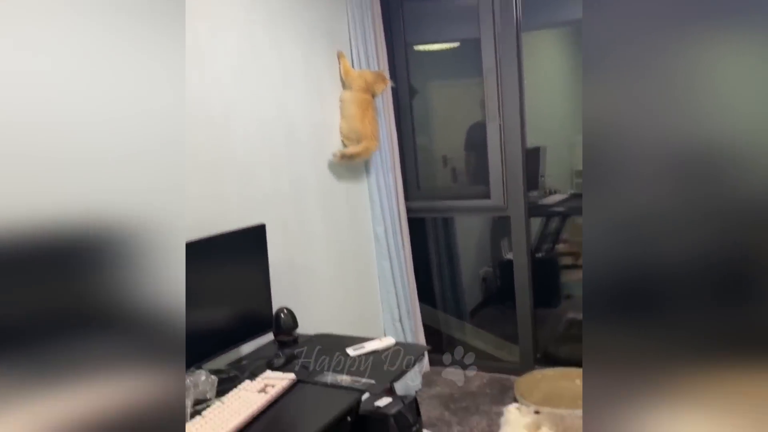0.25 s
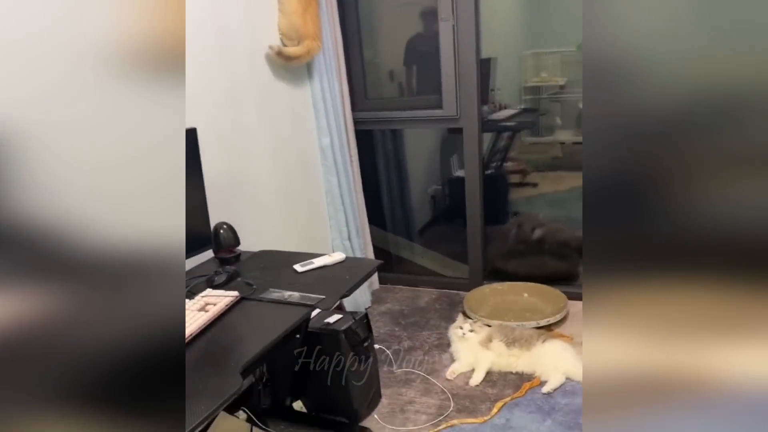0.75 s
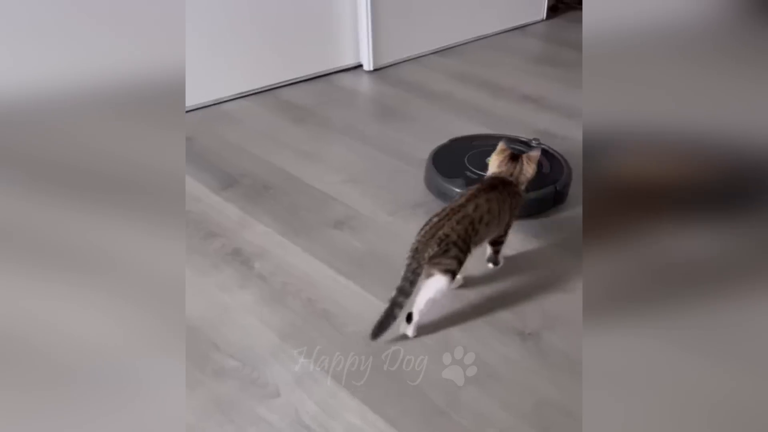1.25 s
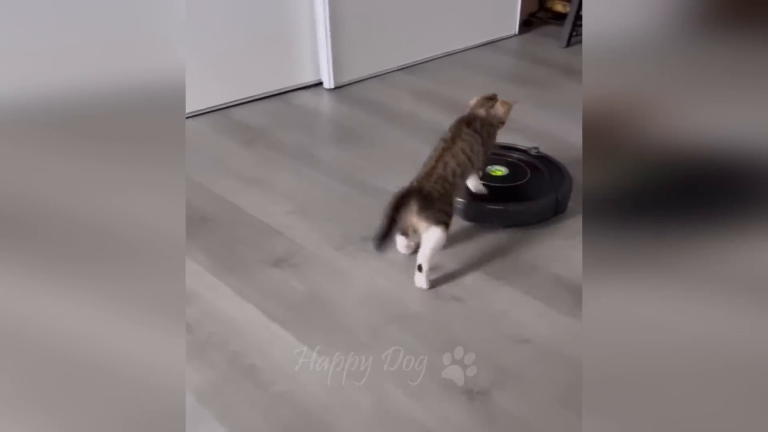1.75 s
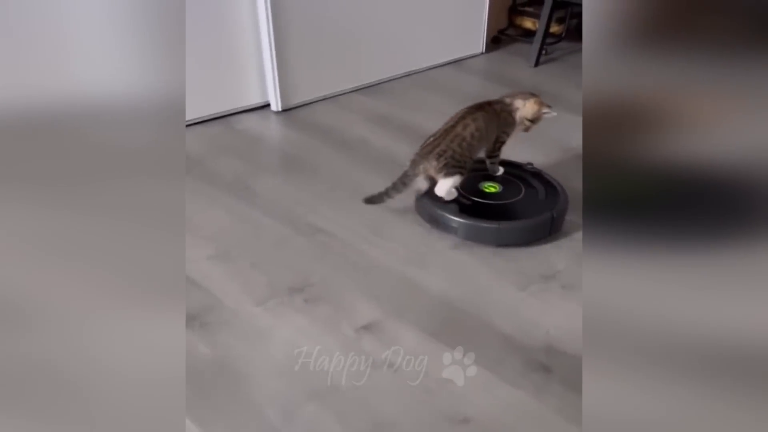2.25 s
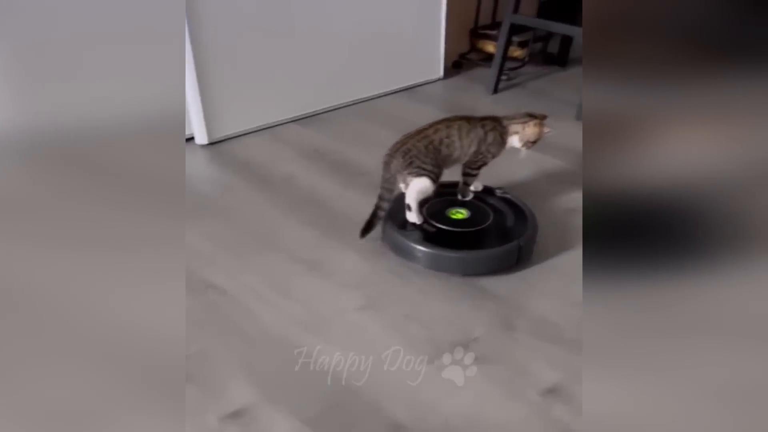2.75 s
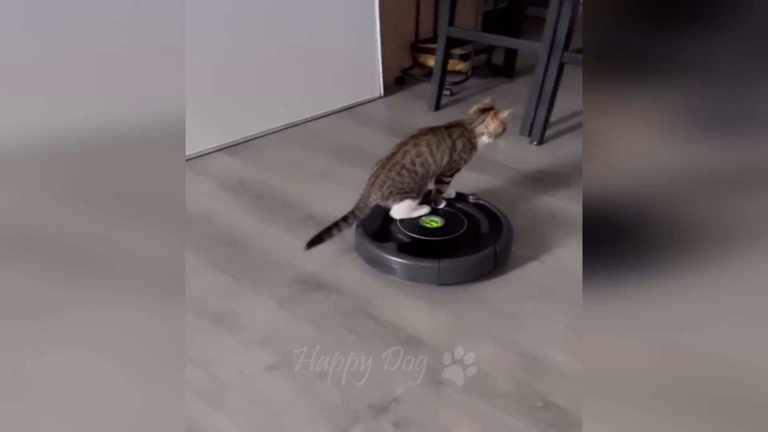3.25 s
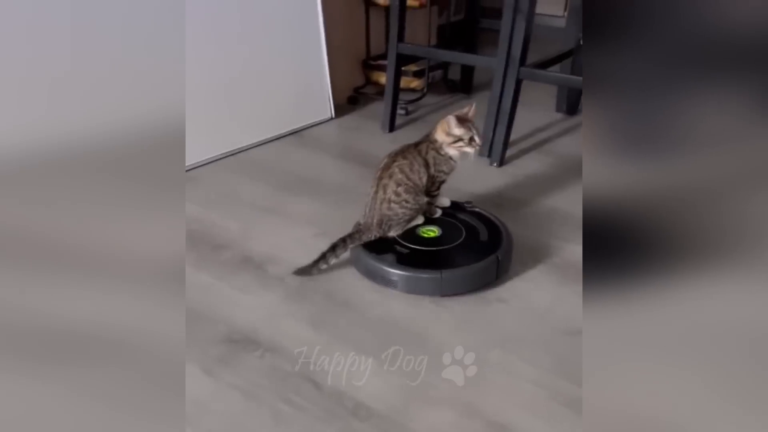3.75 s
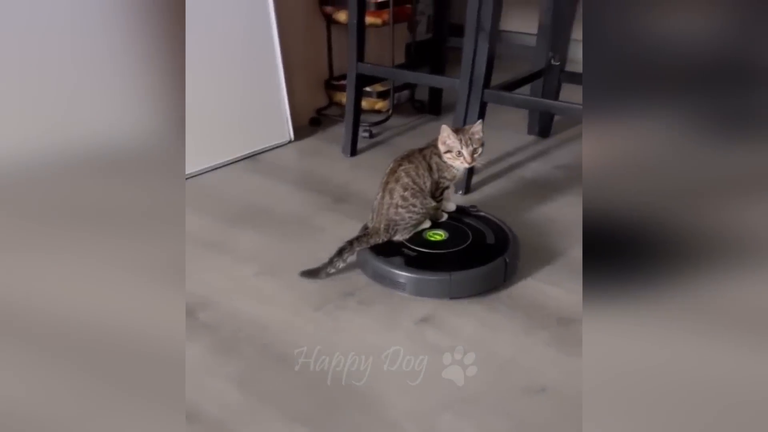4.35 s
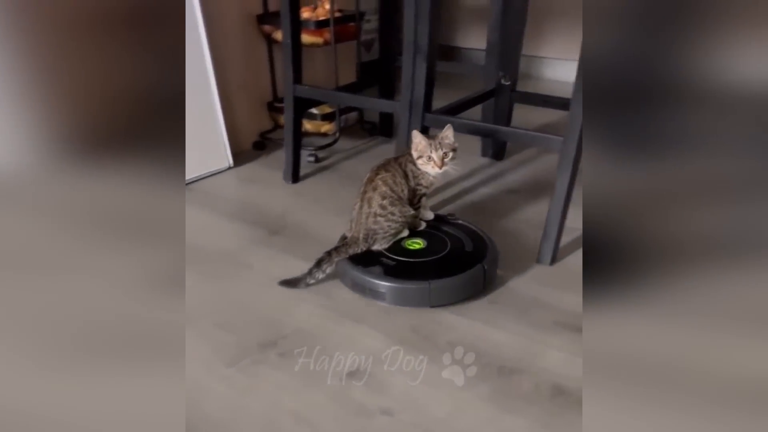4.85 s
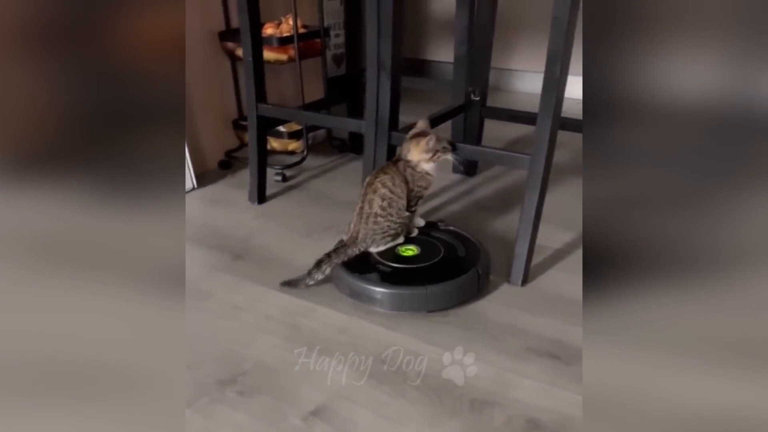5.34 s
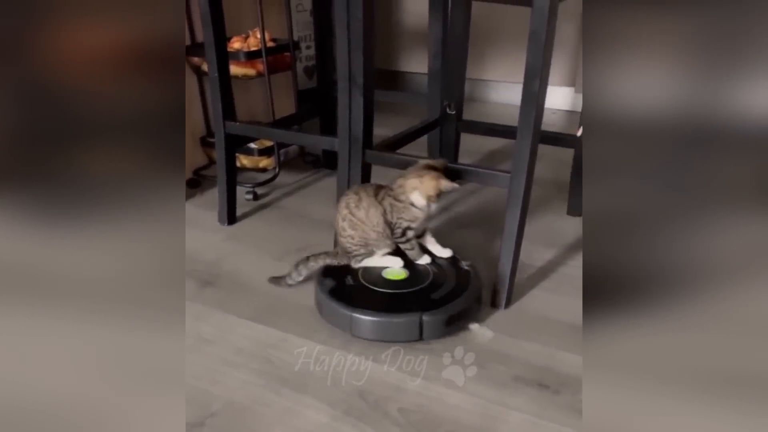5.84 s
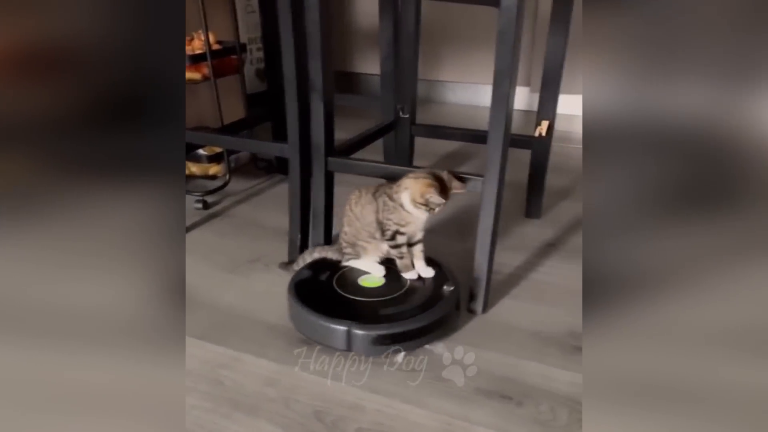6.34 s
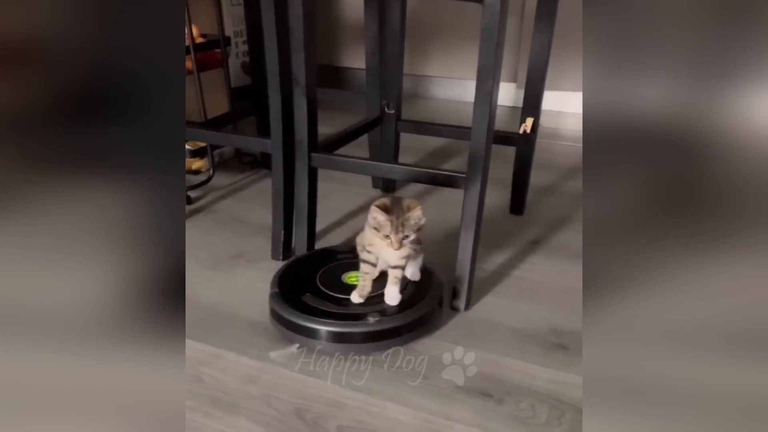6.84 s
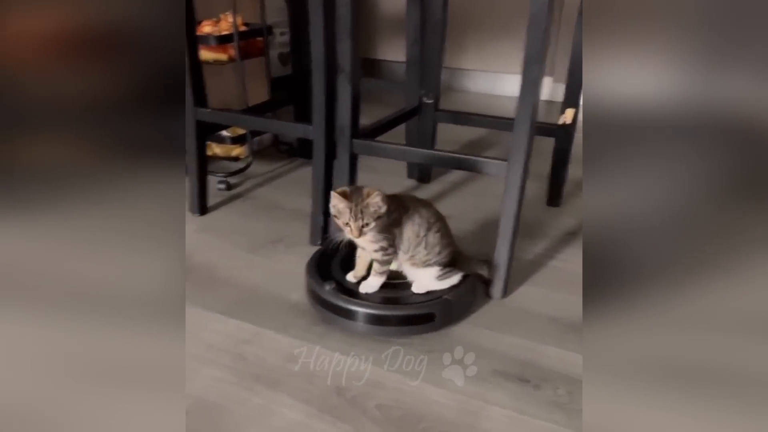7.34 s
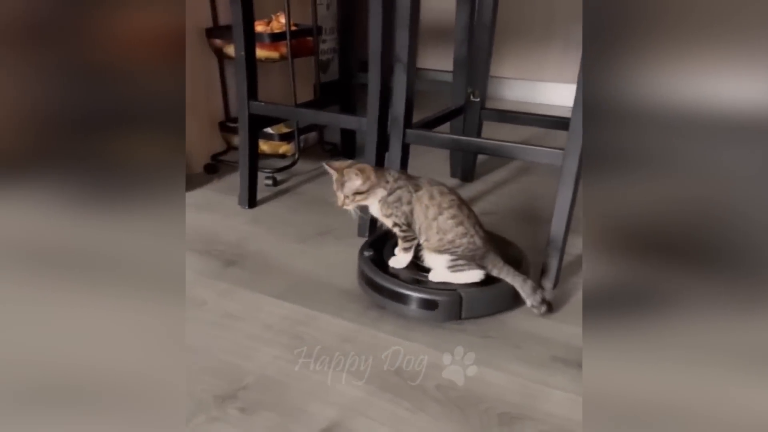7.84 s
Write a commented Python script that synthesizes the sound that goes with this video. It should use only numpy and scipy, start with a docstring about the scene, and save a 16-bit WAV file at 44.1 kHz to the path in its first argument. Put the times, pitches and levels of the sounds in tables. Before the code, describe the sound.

A soft, far-off thump sounds in an otherwise quiet room. After a brief gap, a nearby robot vacuum fades in on a hard indoor floor, hissing and humming steadily with a thin electric whine on top. Past the middle it knocks into a stool with two sharp plastic clacks, then shudders round with low thuds, its hiss growing brighter as the exhaust faces the microphone.

```python
"""A quiet room: faint rustles, then one dull thump far from the microphone. The room fades out by 1 s.
A robot vacuum cleaner fades in close by, crossing a hard floor: its suction fan hums over rushing air,
the brush gearbox whines and throbs, and a thin electric tone rides on top. Near 5.2 s and 6 s the bumper
clacks against stool legs and the brush motor sags under load. The shell thuds and the wheels judder
as the machine turns, until its exhaust vent swings round toward the microphone."""
import sys
import numpy as np
from scipy import signal
from scipy.fft import rfft, irfft, next_fast_len
from scipy.io import wavfile
from scipy.ndimage import uniform_filter1d, map_coordinates

SR = 44100
rng = np.random.default_rng(int(sys.argv[2]) if len(sys.argv) > 2 else 0)


def unload_audio(sound):
    """Save the sound as a 16-bit wav file, at the path given as the first command line argument."""
    columns = np.transpose(np.atleast_2d(sound))
    # keep every value between -1 and 1, then stretch to whole-number steps
    steps = np.round(np.clip(columns, -1, 1) * 32767)
    wavfile.write(sys.argv[1], SR, steps.astype(np.int16))


N = 356769
T = np.arange(N) / SR
TURNED = np.clip((T - 5.3) / 1.84, 0, 1)  # share of the half turn done

# Suction roar and bristle hiss at the microphone, driving away and turned round.
# Each row: frequency in Hz, relative noise density in dB.
SUCTION_AWAY = [(140, -32), (200, -34), (253, -20.5), (337, 0), (450, -3), (508, -3.5), (600, -8),
                (829, -1.5), (964, -5.5), (1060, -3.5), (1660, -8), (2190, -6.5), (2400, -10.5),
                (3000, -10), (4570, -13), (5800, -28.5), (7800, -23), (13200, -120)]
SUCTION_TURNED = [(140, -45), (230, -22.5), (332, -1), (468, -6), (501, -10), (543, -6), (704, -2.5),
                  (913, -8.5), (1090, -5.5), (1280, -6), (1910, -9.5), (2190, -2.5), (2400, -15.5),
                  (3980, -10.5), (6000, -24.5), (7800, -63), (13200, -120)]
HISS_AWAY = [(3240, -17.5), (5500, -1.5), (5690, -2.5), (6690, 2.5), (7470, -10), (8450, 1.5), (10600, -5),
             (11100, -4), (12500, -19), (16200, -47), (22000, -120)]
HISS_TURNED = [(3240, -32), (5500, 2), (5770, 4), (6620, 9), (7400, 7), (8100, 9), (9050, 5), (9800, 5.5),
               (11400, 2.5), (11900, 0), (12500, -18), (16200, -49), (22000, -120)]
# The machine's nearness to the microphone. Each row: time in seconds, gain in dB.
NEARNESS_GAIN = [(1.5, 0), (2.2, -0.3), (3.5, 1), (4.9, -0.5), (5.5, 0), (5.9, 1.5), (6.3, 0.5),
                 (8.09, 0.66)]
# The fan's hums. Each row: multiple of the shaft rate, level in dB, flutter in dB.
FAN_HUMS = [(2, -7.5, 2), (3, -1.5, 1.3), (4, -14.5, 1.5), (5, -8.5, 2.2), (6, -14.5, 1)]
# The body shades a hum from the microphone. Each row: multiple, time and width in seconds, gain in dB.
HUM_SHADOWS = [(3, 5.42, .13, -5), (3, 6.2, 0.14, -17), (3, 6.48, .1, -14), (5, 5.0, 0.2, -15),
               (5, 7.06, .22, -18)]
# The brush motor labours at the stool, recovers briefly at the second bump and sags again.
# Each row: time in seconds, shaft rate in Hz.
BRUSH_SHAFT = [(1.5, 361.4), (4.1, 363.2), (4.5, 363.3), (5.0, 358.3), (5.6, 353), (5.8, 336.4),
               (5.95, 348.2), (6.25, 338.6), (6.42, 345.5), (6.56, 358.7), (8.09, 359.4)]
# The brush gearbox's tones. Each row: multiple of the shaft rate, level in dB.
GEAR_TONES = [(5, -15), (6, -3), (7, -15.5)]
# Gear whine and growl, swelling as the brush drags round. Each row: time in seconds, level in dB.
GEAR_WHINE_LEVEL = [(1.1, -43), (1.4, -41), (1.7, -44), (2.3, -47), (4.0, -42), (4.9, -43.5), (5.35, -45.5),
                    (6.03, -41), (6.22, -38.5), (6.5, -43), (6.76, -37.5), (7.05, -48), (8.09, -44)]
GROWL_LEVEL = [(1.6, -46), (2.3, -52), (3.0, -48), (4.2, -47), (4.7, -47), (4.9, -55), (6.35, -51.5),
               (7.02, -44), (7.75, -42), (8.09, -45.5)]
# The fan motor's electric whine, sidebands spaced by its speed. Each row: frequency in Hz, level in dB.
WHINE_TONES = [(7156, -70), (7494, -69), (7834, -70), (8005, -69), (8344, -71), (9030, -80), (9367, -65),
               (10045, -62.5), (10384, -67), (10693, -72), (10727, -62), (11063, -73), (11407, -70),
               (11579, -73), (11752, -67), (11919, -74), (12086, -73)]
# Lobes of that whine sweep past the microphone. Each row: time and width in seconds, gain in dB.
WHINE_SWEEPS = [(2.1, 0.57, 12.5), (5.05, 0.56, 18.5)]
# Bumper hits and rebounds on the stool legs. Each row: start in seconds, level in dB,
# then crack, push and hollow body in relative dB.
BUMPER_HITS = [(5.169, -25, -14, -6, -9), (5.1943, -16.5, -6, 8.5, 0), (5.1997, -38, -16, 10, -12),
               (5.2038, -38, -10, 13, -9), (5.2087, -39, -18, 8, 1), (5.985, -27, -2, -9, -22),
               (5.991, -32, 7, -9, -22), (6.0013, -15.5, 5, -11, -19), (6.0039, -21.5, -6, 14, -8),
               (6.0077, -27.5, -10, 5, -9), (6.0176, -31, -18, 11, -11)]
# The bumper's rattle. Each row: frequency in Hz, relative noise density in dB.
RATTLE_SPECTRUM = [(120, -37), (220, -5), (330, 7), (710, -3), (1400, -3.5), (2300, -3.5), (3300, -7.5),
                   (4200, -14), (6400, -17), (12500, -27)]
# Ring of the plastic shell and hollow chassis. Each row: frequency in Hz, level in dB, t60 in seconds.
SHELL_MODES = [(605, 2, 0.049), (777, 1.5, 0.086), (960, -5, 0.055), (1150, -0.5, 0.1), (1360, 4, 0.043),
               (1510, -4, 0.06), (1875, 5, 0.036), (2060, 5, 0.023), (2230, -12, 0.045), (2850, -15, 0.037),
               (3280, -17, .035)]
CHASSIS_MODES = [(253, -12, 0.075), (331, -3.5, 0.15), (424, 2, 0.086), (556, -9, 0.073)]
# Soft thuds of the chassis. Each row: start in seconds, level in dB, pitch in Hz.
CHASSIS_THUDS = [(1.554, -21.5, 336), (2.775, -24, 338), (2.86, -34.5, 90), (3.66, -29, 336),
                 (5.375, -25, 403), (5.380, -25.5, 219), (5.522, -22.5, 176), (5.839, -22, 343),
                 (5.92, -18, 165), (6.040, -24, 141), (6.127, -24, 144), (6.152, -25, 412),
                 (6.225, -29, 355.6), (6.664, -25.5, 399)]
# Exhaust slots, each beaming its own way. Each row: frequency and bandwidth in Hz, level in dB,
# time it faces the microphone and width of that pass in seconds.
VENT_SLOTS = [(2540, 45, -1, 7.35, .45), (2765, 41, 8, 7.82, 0.21), (2950, 200, -5.5, 7.9, 0.29),
              (3460, 390, -6, 7.5, 0.11), (3870, 310, -8, 7.4, 0.43), (6570, 290, -9, 7.75, .2),
              (8120, 290, -9.5, 6.9, .25), (8630, 590, -4, 7.73, 0.27), (9280, 200, -4, 7.58, 0.17),
              (9800, 270, -10, 7.3, 0.28)]
# Resonances of the brush housing. Each row: frequency and bandwidth in Hz, level in dB.
HOUSING_MODES = [(2524, 65, 3.5), (2845, 110, 1), (3080, 110, 4), (3327, 86, 3.5), (3640, 170, 1),
                 (4100, 114, -1), (4410, 140, -4.5), (4710, 84, -1), (5190, 82, -3), (6600, 490, -20)]
# The brush catches a crumb or a joint in the boards. Each row: start in seconds, level in dB,
# t60 in seconds.
BRUSH_SCUFFS = [(2.745, -34, .12), (3.66, -37, .2)]
# The wheels slow before the stool, swing the machine round in jerks and drive off.
# Each row: time in seconds, share of cruising speed.
WHEEL_PACE = [(3.1, 1.16), (3.8, .85), (4.6, 0.46), (5.0, 0.32), (5.6, .9), (6.15, 2.1), (6.5, 1.6),
              (6.75, 0.7), (7.0, 1.3), (7.33, 0.56), (7.7, 0.97), (7.9, 2)]
# Wheel gears. Each row: pitch in Hz, dB driving away, dB turned round, dB lost at a standstill.
WHEEL_TONES = [(141.5, -62.5, -61, -4), (582, -64, -53, -6), (718, -58, -51.5, -1), (777, -50, -65, 20),
               (1211, -55, -68, 4), (2032, -58, -53, -10), (2214, -58, -49, -13)]
# Wheels on the boards, drone of their drives, floor rumble.
# Each row: frequency in Hz, relative noise density in dB.
ROLL_SPECTRUM = [(35, -39), (60, -2.5), (107, -5), (140, -0.5), (177, -5.5), (200, -7.5), (240, -6),
                 (300, -11), (390, -26), (660, -120)]
DRONE_SPECTRUM = [(190, -60), (225, -13), (245, -0.5), (268, 2), (295, -2.5), (340, -24), (450, -90)]
RUMBLE_SPECTRUM = [(14, -25), (22, -6), (29, -5), (35, 9), (42, -14), (52, -21), (70, -20), (95, -18),
                   (130, -53)]
# Weight of the rolling and the drone along the way. Each row: time in seconds, level in dB.
ROLLING_LEVEL = [(1.3, -53), (1.65, -53.5), (2.3, -58), (2.9, -55), (3.3, -55), (3.85, -51), (4.4, -53),
                 (5.0, -56), (5.6, -52.5), (6.5, -48), (6.8, -53.5), (7.7, -54.5), (8.0, -52)]
DRONE_LEVEL = [(1.5, -51.5), (2.0, -50.5), (2.7, -47), (3.7, -50), (3.95, -61), (5.1, -54), (5.4, -49),
               (5.9, -50.5), (6.4, -49), (7.1, -54), (8.09, -52)]
# The far thump's scuff, and the quiet room's rumble and air.
# Each row: frequency in Hz, relative noise density in dB.
THUMP_SPECTRUM = [(100, -22), (200, 5.5), (270, -6), (450, 1), (700, -9.5), (1050, -8.5), (1500, -10.5),
                  (2300, -17), (3000, -25), (4800, -29), (7500, -31), (9500, -46), (12000, -56)]
ROOM_RUMBLE = [(15, -52), (25, -23), (70, -8.5), (102, -13.5), (172, -13), (216, -27.5), (274, -15),
               (500, -47), (650, -73), (1100, -120)]
ROOM_AIR = [(250, -23), (400, 1.5), (520, 1), (700, 0.5), (890, -5), (985, 7), (1045, -5), (1100, 4.5),
            (1200, -4), (2000, -8), (2650, -15), (2900, -26), (4500, -25), (8000, -30), (12000, -36)]
# What the thump rings with. Each row: frequency in Hz, level in dB, t60 in seconds.
THUMP_TONES = [(318, -0.5, .23), (366, -4, 0.21), (420, -2, 0.19), (561, -10, .2), (750, -12, 0.22),
               (897, -11, .3), (980, -2, 0.23), (1270, -9, .17), (1600, -13, .22), (2000, -16, .3),
               (2350, -13, .22), (3040, -19, .17), (4700, -23, .2), (7100, -30, .1), (7650, -29, .1)]
# Booms after the scuff. Each row: start in seconds, level in dB, pitch in Hz, t60 in seconds.
THUMP_BOOMS = [(.448, -37.5, 170, 0.17), (0.473, -34, 344.7, 0.19), (.527, -43, 74, 0.1),
               (.553, -43, 359.6, 0.24), (.598, -41, 164, 0.23), (.735, -46, 272, 0.16)]
# Light scrapes around the thump. Each row: start in seconds, level in dB, t60 in seconds.
THUMP_SCRAPES = [(.415, -56, .14), (.430, -54, 0.099), (.441, -51, 0.1), (.476, -58, .22)]
# Faint rustles either side of it. Each row: time and width in seconds, level in dB.
FAINT_RUSTLES = [(.37, 0.068, -67.5), (.77, 0.12, -71.5)]
# Decay of the thump's scuff and of the walls' echo. Each row: frequency in Hz, t60 in seconds.
THUMP_DECAY = [(150, 1), (350, 0.43), (1000, 0.55), (4000, 0.43), (10000, 0.19)]
WALL_DECAY = [(150, 0.26), (1500, 0.22), (10000, 0.32)]
# Echoes off floor, wall and furniture. Each row: first and last delay in seconds, gain.
ECHO_PATHS = [(.0011, 0.00068, 0.011), (.0034, .0046, 0.02), (.0083, .0068, .15)]
# The floor's echo cancels a band of hiss that slides in the turn.
# Each row: time in seconds, centre in Hz, gain in dB.
FLOOR_NOTCH = [(6.5, 7750, 2), (6.85, 7400, -10), (7.3, 7300, -5), (7.6, 7260, 0), (8.0, 7050, -3)]
# Noise at the stereo microphone. Each row: frequency in Hz, left-right likeness from 0 to 1.
NEAR_LIKENESS = [(60, 0.35), (130, 0.73), (280, 0.96), (590, 0.93), (1280, 0.92), (2740, 0.86),
                 (5890, 0.81), (12600, 0.63)]
FAR_LIKENESS = [(100, 0.062), (600, 0.035), (5000, 0.092)]

# Each layer: dB driving away, dB added under full strain, dB added once turned round.
SUCTION_DB, HISS_DB, RASP_DB = (-37, 0.5, 1), (-50, 1, 1), (-43, 2, 0)
FAN_DB, WHINE_DB = (-42.7, -0.8, -0.6), (-11.5, 8, -21)
FAN_SHAFT_HZ = 169.9
THROB_HZ, THROB_CREST_S, THROB_DB = 3.765, 2.72, 4.2  # one throb per turn of the brush
STRAIN_S, STRAIN_RISE_S, STRAIN_HOLD_S, STRAIN_RELEASE_S = 5.15, 0.88, 0.88, 0.46


def airflow():
    """Suction roars and bristles hiss, both pulsing as the brush slaps the floor."""
    slaps = np.cos(angle(27 * (1 + 0.014 * wobble(3.42))))
    drag_db = .5 * wobble(9) + .5 * wobble(45)  # the bristles catch unevenly
    air = turning_noise(SUCTION_AWAY, SUCTION_TURNED) * amp(running(SUCTION_DB) + drag_db + 0.35 * slaps)
    hiss = turning_noise(HISS_AWAY, HISS_TURNED) * amp(running(HISS_DB) + drag_db + 0.87 * slaps)
    return air + hiss


def fan():
    """The impeller holds its speed, fluttering a little, and hums on multiples of its shaft rate."""
    shaft = angle(FAN_SHAFT_HZ * (1 + 0.00251 * wobble(45) + 0.0008 * wobble(0.795)))
    out = np.zeros(N)
    for k, level, flutter_db in FAN_HUMS:
        shade_db = sum(db * bell(s, width) for order, s, width, db in HUM_SHADOWS if order == k)
        out += amp(running(FAN_DB) + level + shade_db + flutter_db * wobble(14)) * np.sin(k * shaft)
    return np.sqrt(2) * out


def brush_motor():
    """A rough gear whine throbs with each turn of the brush and sags in pitch at the stool."""
    load = np.cos(2 * np.pi * THROB_HZ * (T - THROB_CREST_S))
    throb_db = THROB_DB * load * np.minimum(curve(WHEEL_PACE), 1) * (1 - strain())
    whine_db = curve(GEAR_WHINE_LEVEL) + throb_db + 1.3 * wobble(28)
    shaft = angle(curve(BRUSH_SHAFT) * (1 + 0.003 * load + 0.0028 * wobble(25) + 0.0116 * wobble(260)))
    growl = amp(curve(GROWL_LEVEL) + load + 1.8 * wobble(30)) * np.sin(3 * shaft)
    gears = sum(amp(whine_db + db + 3.8 * wobble(130)) * np.sin(k * shaft) for k, db in GEAR_TONES)
    return np.sqrt(2) * (growl + gears)


def electric_whine():
    """Chopped motor current sings in thin tones, louder when a lobe points at the microphone."""
    facing_db = running(WHINE_DB) + sum(db * bell(s, width) for s, width, db in WHINE_SWEEPS)
    speed = 1 + 0.00046 * wobble(4.7)
    return np.sqrt(2) * sum(amp(db + facing_db + wobble(8)) * np.sin(angle(hz * speed + 6 * wobble(90)))
                            for hz, db in WHINE_TONES)


def bumper():
    """Each hit: one push of the plastic skin, a crack, a rattle, and the ring of shell and chassis."""
    out, t = np.zeros((2, N)), np.arange(SR // 4) / SR

    def fade(t60, attack):
        return (1 - np.exp(-t / attack)) * amp(-60 * t / t60)

    def ring(modes):
        return sum(amp(db + rng.normal(0, 1.6)) * fade(t60, attack=0.00091)
                   * np.sin(2 * np.pi * hz * t + rng.normal(0, 1)) for hz, db, t60 in modes)

    bright = noise([(800, -16), (2000, 0), (6500, -2), (12500, -13)])
    dull = noise(RATTLE_SPECTRUM)
    for s, db, crack_db, push_db, body_db in BUMPER_HITS:
        span = slice(round(s * SR), round(s * SR) + len(t))
        contact = (t - .0006) / 0.00022  # time in pulse widths
        push = amp(push_db) * (1 - contact ** 2) * np.exp(-contact ** 2 / 2)
        crack = amp(crack_db) * fade(t60=0.011, attack=0.00025) * bright[:, span]
        rattle = amp(-1) * fade(t60=0.048, attack=0.0007) * dull[:, span]
        ringing = amp(-9) * ring(SHELL_MODES) + amp(body_db - 8) * ring(CHASSIS_MODES)
        out[:, span] += amp(db) * (push + crack + rattle + ringing)
    return out


def thuds():
    """The chassis rocks on its sprung wheels: a dull tap and a few low, damped cycles each time."""
    out = np.zeros((2, N))
    tap = noise([(60, -5), (150, -15), (450, -1), (900, -10), (2500, -7), (8000, -50)])
    for s, db, hz in CHASSIS_THUDS:
        swing = 2 * np.pi * hz * (T - s)
        rocking = np.sin(swing) + .5 * np.sin(0.804 * swing)
        out += amp(db - 2.5) * struck(s, t60=0.085, attack=0.0086) * rocking
        out += amp(db - 10.5) * struck(s, t60=0.064, attack=.001) * tap
    return out


def judder():
    """The wheels shudder on the floor as the machine wrenches round, then settle."""
    shudder = amp(-35 + 3 * wobble(25)) * struck(5.92, t60=1.7, attack=0.064)
    return shudder * noise([(30, -30), (70, -17), (140, 6), (230, 1), (360, 6), (520, -22), (900, -60)])


def vent():
    """Exhaust air rings the slots of the grille, which face the microphone one after another."""
    air = noise([(1000, -30), (2200, 6), (12000, -2.5)])
    slots = sum(bell(s, span) * resonate(air, [(hz, width, db)]) for hz, width, db, s, span in VENT_SLOTS)
    return amp(-30 + 0.66 * wobble(8)) * slots


def bristle_rasp(turns_per_stroke=3, scatter=0.35, decay_s=0.01):
    """Uneven strokes, geared to the brush motor, rasp through the resonances of the housing."""
    stroke_hz = curve(BRUSH_SHAFT) / turns_per_stroke * (1 + .05 * wobble(40))
    count = np.cumsum(stroke_hz) / SR
    sizes = 1 + scatter * rng.uniform(-1.04, 1, size=4096)[count.astype(int)]
    strokes = sizes * np.exp(-(count % 1) / stroke_hz / decay_s)
    rasp = strokes * noise([(1500, -28), (2400, 2.5), (7000, -1), (9000, -12)])
    return amp(running(RASP_DB)) * unit(resonate(rasp, HOUSING_MODES))


def scuffs():
    """Short scrapes of the brush ring through its housing."""
    friction = noise([(1200, -20), (2400, 5), (4000, -5), (9000, -17)])
    scrape = unit(resonate(friction, HOUSING_MODES))
    return sum(amp(db) * struck(s, t60, attack=.004) for s, db, t60 in BRUSH_SCUFFS) * scrape


def grit(ticks_per_s=70, scatter=0.31, decay_s=0.002):
    """Bristles and crumbs tick inside the brush housing."""
    hits = (rng.random(N) < ticks_per_s / SR) * (1 + scatter * rng.uniform(-1, 1, N))
    bursts = signal.lfilter([1], [1, -np.exp(-1 / (decay_s * SR))], hits)
    return amp(-44.5) * bursts * noise([(300, -7), (900, -4), (3500, -5), (6000, -17), (12000, -16)])


def wheel_roll():
    """Wheels roll over the boards, their drives drone, and the floor rumbles more with speed."""
    rolling = noise(ROLL_SPECTRUM) * amp(curve(ROLLING_LEVEL) + 1.1 * wobble(12))
    drone = noise(DRONE_SPECTRUM) * amp(curve(DRONE_LEVEL))
    rumble = noise(RUMBLE_SPECTRUM, likeness=[(30, 0.38), (100, .5)]) * amp(-53.5 + 0.97 * wobble(3.1))
    return rolling + drone + rumble * curve(WHEEL_PACE) ** 1.1


def wheel_gears():
    """The wavering hum of the wheel gears changes with the heading and as the wheels slow down."""
    slowed = np.maximum(1 - curve(WHEEL_PACE), 0)
    out = np.zeros(N)
    for hz, away_db, turned_db, lost_db in WHEEL_TONES:
        db = away_db + TURNED * (turned_db - away_db) - lost_db * slowed + 2.65 * wobble(8)
        out += amp(db - 1) * np.sqrt(2) * np.sin(angle(hz * (1 + 0.00695 * wobble(40))))
    return out


def far_thump():
    """Far from the microphone: a thin tick, light scrapes, a ringing scuff, then a few dull booms."""
    tick = amp(-63) * struck(0.287, t60=.12, attack=.005) * far_noise([(8000, -40), (10300, 0), (12500, 0)])
    friction = far_noise([(500, -4), (2500, 10.5), (5000, 1), (11000, -22)])
    scrapes = sum(amp(db) * struck(s, t60, attack=0.0036) for s, db, t60 in THUMP_SCRAPES) * friction
    swell = np.interp(T, [.41, .42, .436, .45], [0, 0.061, 0.25, 0.93])
    scuff = amp(-36 + 1.9 * wobble(160)) * swell * dying(far_noise(THUMP_SPECTRUM), 0.4, THUMP_DECAY)
    ring = sum(amp(db - 40.5) * struck(.447, t60, attack=.008)
               * np.sin(angle(hz * (1 + .008 * wobble(60)))) for hz, db, t60 in THUMP_TONES)
    booms = sum(amp(db) * struck(s, t60, attack=0.0041)
                * np.sin(angle(hz * (1 + 0.091 * wobble(90.7)))) for s, db, hz, t60 in THUMP_BOOMS)
    return tick + scrapes + scuff + room(booms + ring, wet_db=2)


def room_tone(sink_s=0.54, sink_db_per_s=26):
    """The quiet room's rumble and air sink away after the thump, under two faint rustles."""
    sink = amp(-sink_db_per_s * np.maximum(T - sink_s, 0))
    bed = amp(-52) * far_noise(ROOM_RUMBLE) + amp(-63) * far_noise(ROOM_AIR)
    rustle = far_noise([(400, -6), (1500, 8), (4500, -5), (7000, -15), (12000, -26)])
    return sink * bed + sum(amp(db) * bell(s, width) for s, width, db in FAINT_RUSTLES) * rustle


def reflected(x):
    """Weak echoes comb the noise, their delays drifting as the machine moves."""
    out = x.copy()
    for first, last, gain in ECHO_PATHS:
        delayed = np.arange(N) - SR * np.linspace(first, last, N)
        out += gain * np.array([map_coordinates(side, [delayed]) for side in x])
    return out


def shimmer(x, patch_db=1.4, notch_width_hz=300):
    """The hiss shimmers in slow random patches of treble, and one notch slides through it."""
    hz, t, spectra = signal.stft(x, SR, nperseg=512)
    field = uniform_filter1d(rng.standard_normal(spectra.shape[1:]), size=3, axis=0)
    field = uniform_filter1d(field, size=60, axis=1)
    patches = patch_db * unit(field) * np.clip(hz / 6000, 0, 1)[:, None]
    s, centre_hz, gain_db = np.transpose(FLOOR_NOTCH)
    offset = (hz[:, None] - np.interp(t, s, centre_hz)) / notch_width_hz
    notch = np.interp(t, s, gain_db) * np.exp(-.5 * offset ** 2)
    return signal.istft(spectra * amp(patches + notch), SR, nperseg=512)[1][:, :N]


def room(x, wet_db):
    """The direct sound plus the short stereo answer of the walls."""
    tail = dying(rng.standard_normal((2, SR // 3)), 0, WALL_DECAY)
    tail[:, :SR // 300] = 0  # gap before the first reflection
    echo = signal.fftconvolve(np.atleast_2d(x), tail / np.linalg.norm(tail[0]), axes=1)[:, :N]
    return x + amp(wet_db) * echo


def strain():
    """How hard the machine pushes against the stool, 0 to 1."""
    corners = STRAIN_S + np.cumsum([0, STRAIN_RISE_S, STRAIN_HOLD_S, STRAIN_RELEASE_S])
    return np.interp(T, corners, [0, 1, 1, 0])


def running(levels):
    """A layer's level in dB, following nearness, strain and heading."""
    away_db, strain_db, turned_db = levels
    return away_db + curve(NEARNESS_GAIN) + strain_db * strain() + turned_db * TURNED


def noise(spectrum, likeness=NEAR_LIKENESS):
    """Coloured stereo noise of rms about 1, from (Hz, dB) points."""
    def response(hz):
        spread = np.arccos(np.clip(along(likeness, hz), -1, 1)) / 2
        return amp(along(spectrum, hz)) * [np.cos(spread), np.sin(spread)]

    mid, side = filtered(rng.standard_normal((2, N)), response)
    return np.array([mid + side, mid - side]) / np.std(mid)


def far_noise(spectrum):
    """Diffuse noise, left and right barely alike."""
    return noise(spectrum, FAR_LIKENESS)


def turning_noise(away, turned):
    """Noise that crossfades between two spectra in the turn."""
    return np.sqrt(1 - TURNED) * noise(away) + np.sqrt(TURNED) * noise(turned)


def resonate(x, modes):
    """x through (Hz, bandwidth Hz, dB) resonances."""
    return filtered(x, lambda f: sum(amp(db) * 1j * f * width / (hz * hz - f * f + 1j * f * width)
                                     for hz, width, db in modes))


def filtered(x, response):
    """x shaped by a frequency response."""
    size = next_fast_len(N + 8192)
    return irfft(rfft(x, size) * response(np.fft.rfftfreq(size, 1 / SR)), size)[..., :N]


def dying(x, start, t60s):
    """Each frequency of x dies at its own speed after start."""
    hz, t, spectra = signal.stft(x, SR, nperseg=256)
    fall = amp(-60 * np.maximum(t - start, 0) / along(t60s, hz)[:, None])
    return signal.istft(spectra * fall, SR, nperseg=256)[1][..., :x.shape[-1]]


def struck(s, t60, attack):
    """Envelope of a blow at time s."""
    age = np.maximum(T - s, 0)
    return (1 - np.exp(-age / attack)) * amp(-np.minimum(60 * age / t60, 200))


def bell(s, width):
    """A smooth rise and fall around time s, 0 to 1."""
    return np.exp(-.5 * ((T - s) / width) ** 2)


def wobble(rate):
    """A smooth random curve with rate knots a second."""
    return map_coordinates(rng.standard_normal(4096), [T * rate], mode="wrap")


def angle(hz):
    """Phase of something turning at a changing rate."""
    return 2 * np.pi * (np.cumsum(hz) / SR + rng.random())


def curve(points):
    """(seconds, value) points read at every sample."""
    return np.interp(T, *np.transpose(points))


def along(points, hz):
    """(Hz, value) points read on a log axis."""
    freqs, values = np.transpose(points)
    return np.interp(np.log(hz + 1), np.log(freqs + 1), values)


def amp(db):
    """Decibels to gain."""
    return 10 ** (np.asarray(db) / 20)


def unit(x):
    """Scale to rms 1."""
    return x / np.sqrt(np.mean(x ** 2) + 1e-20)


def scene():
    """The quiet room, a little to the right, fades out; the machine fades in near the centre."""
    fade_out = np.clip((.962 - T) / 0.024, 0, 1)
    fade_in = np.clip((T - 1.04) / 0.48, 0, 1) ** 1.04
    pan_db = 0.36 + 0.5 * TURNED  # left minus right
    hum = room(fan(), wet_db=-20)
    whines = room(brush_motor() + electric_whine() + wheel_gears(), wet_db=-13)
    knocks = room(bumper() + thuds(), wet_db=-18)
    rush = shimmer(reflected(airflow()) + wheel_roll() + vent() + grit() + scuffs() + bristle_rasp())
    machine = (rush + judder() + hum + whines + knocks) * amp([pan_db / 2, -pan_db / 2])
    quiet = (room_tone() + far_thump()) * amp([[-1.8], [1.8]])
    return fade_out * quiet + fade_in * machine


def record(dry):
    """The sound's range ends steeply at 12.6 kHz."""
    return filtered(dry, lambda hz: 1 / np.sqrt(1 + (hz / 12600) ** 160))


dry = scene()
out = record(dry)
unload_audio(out)
```